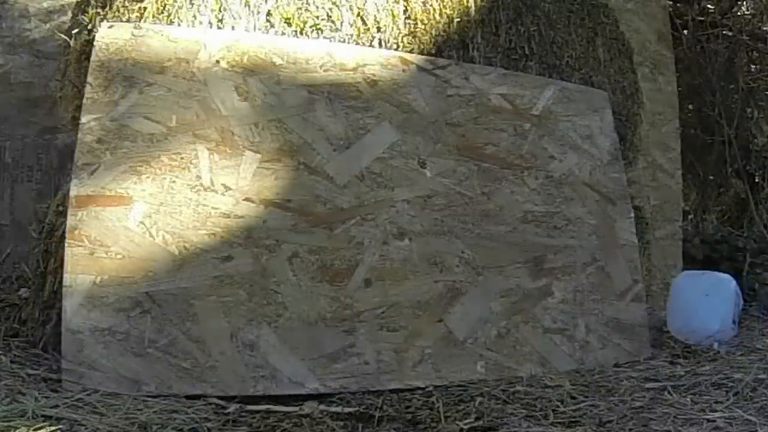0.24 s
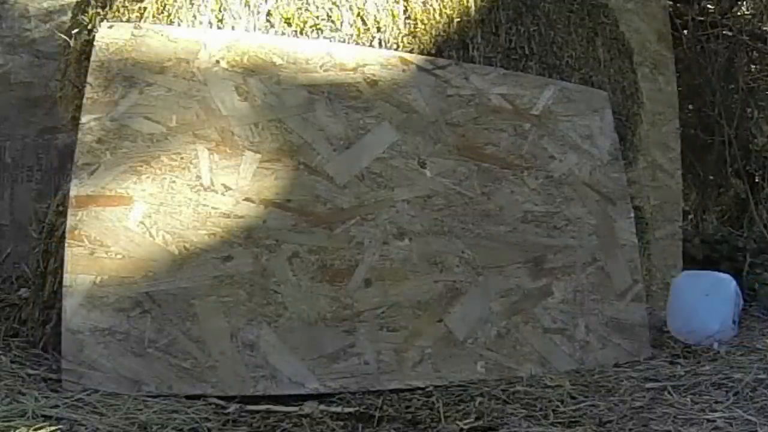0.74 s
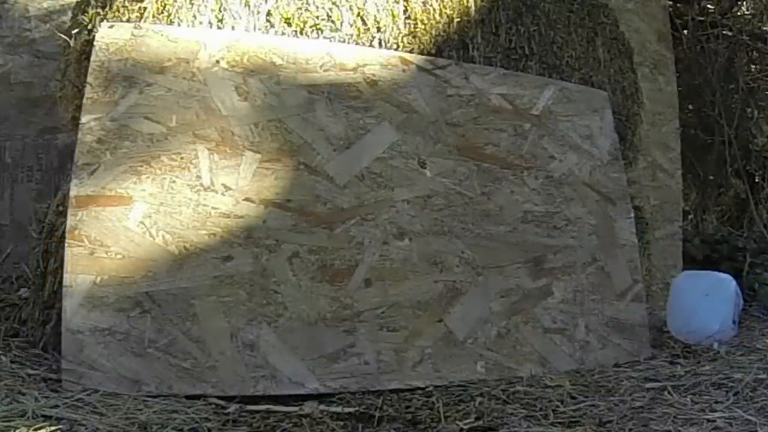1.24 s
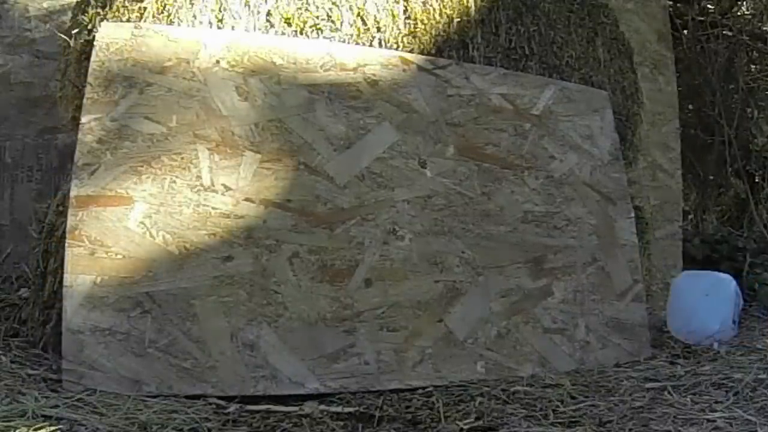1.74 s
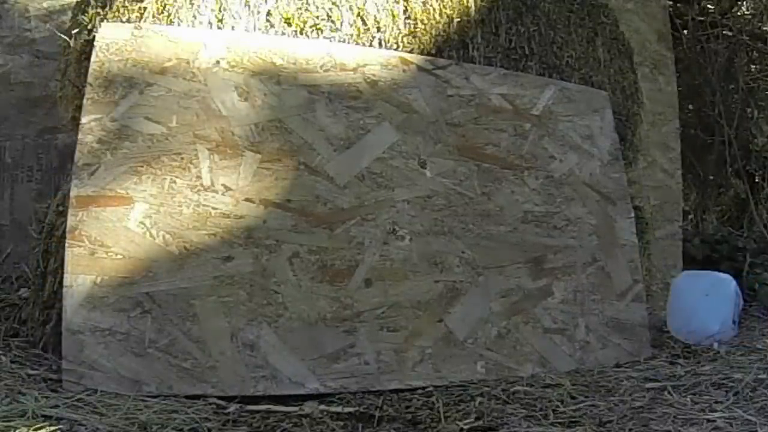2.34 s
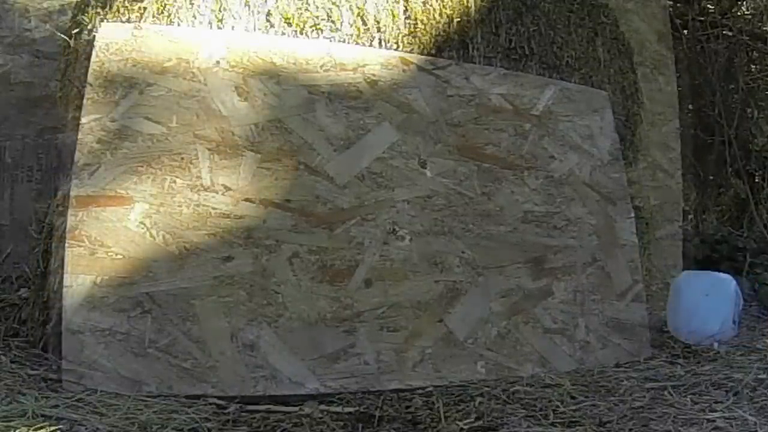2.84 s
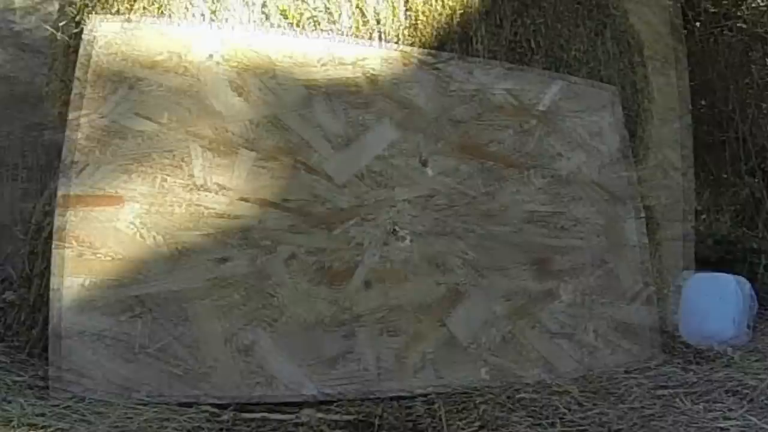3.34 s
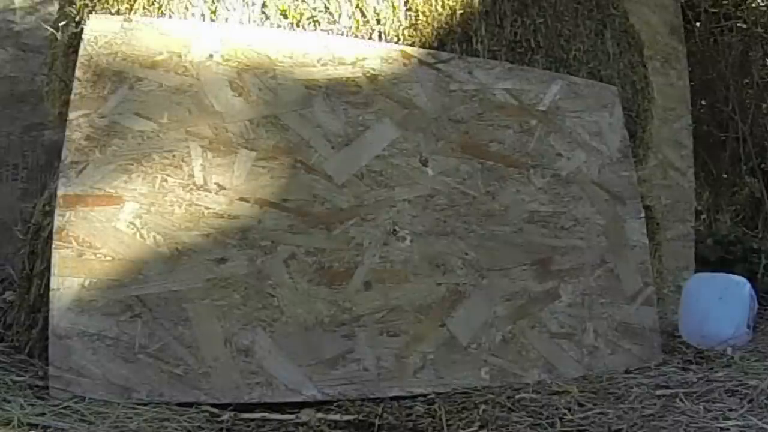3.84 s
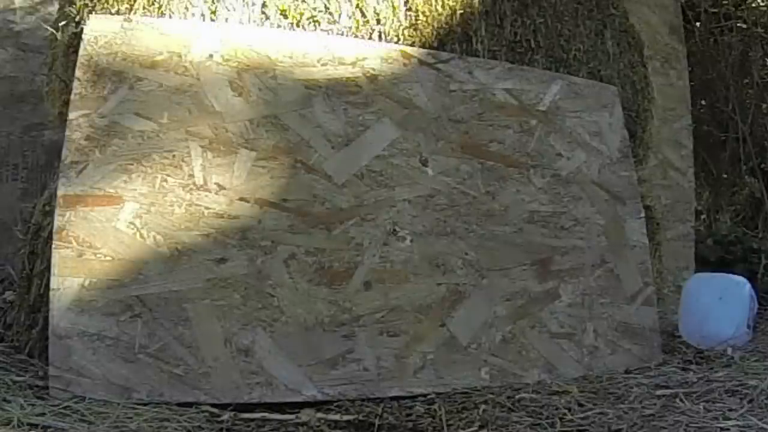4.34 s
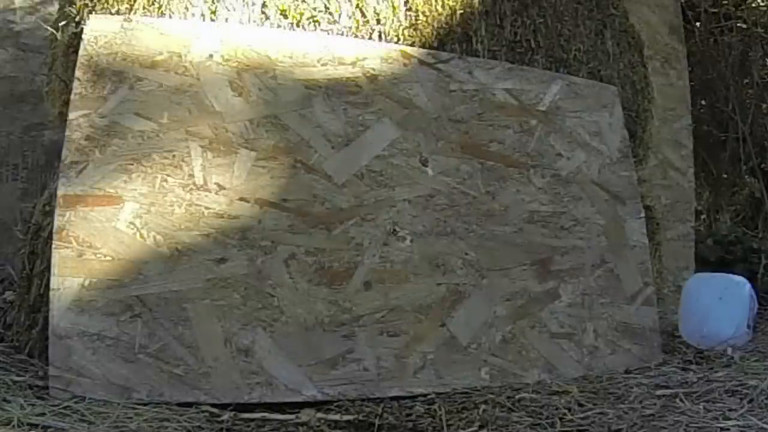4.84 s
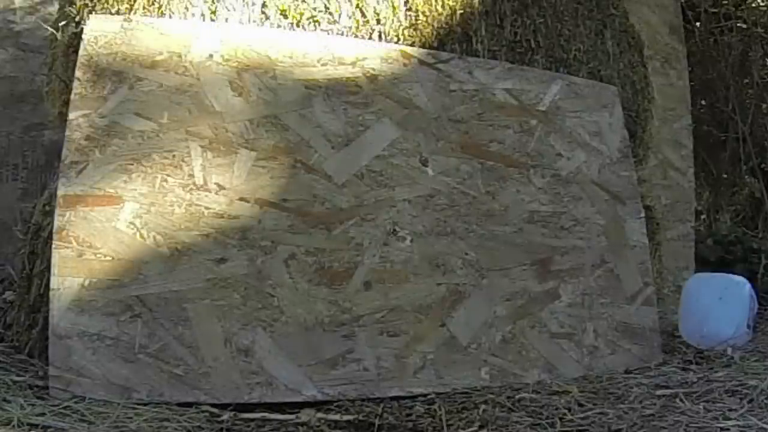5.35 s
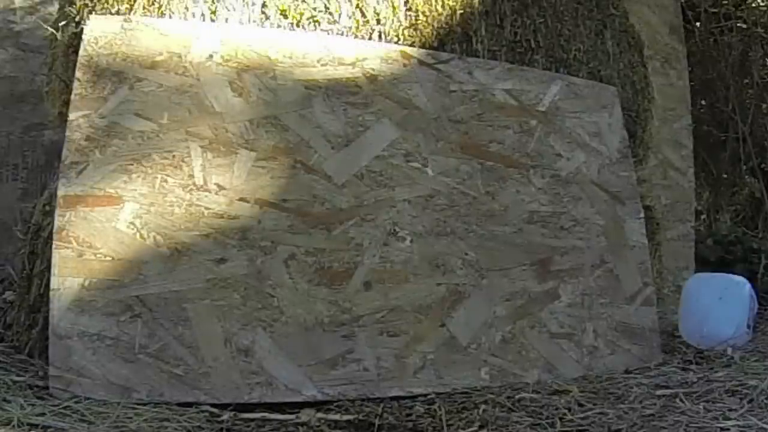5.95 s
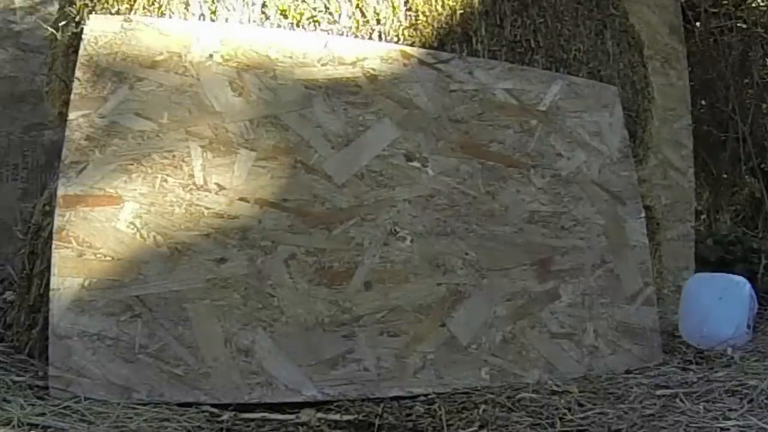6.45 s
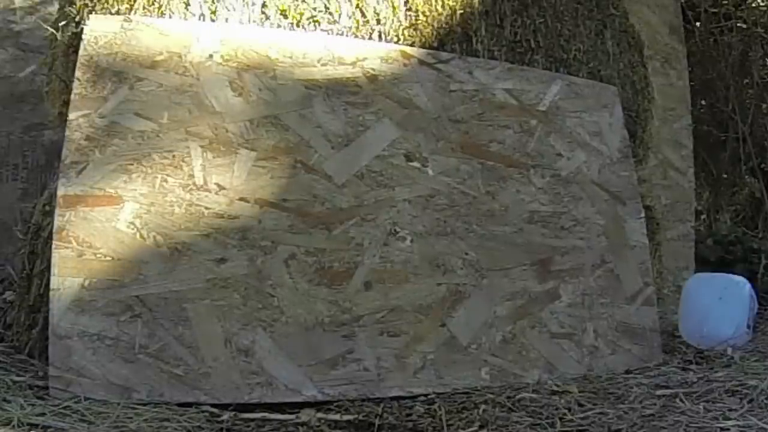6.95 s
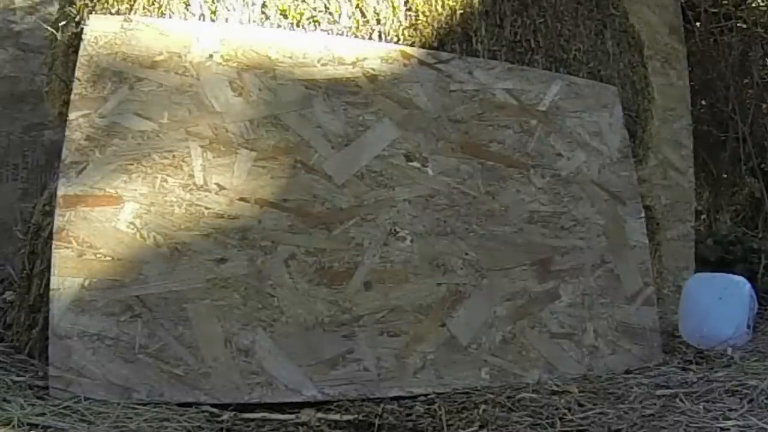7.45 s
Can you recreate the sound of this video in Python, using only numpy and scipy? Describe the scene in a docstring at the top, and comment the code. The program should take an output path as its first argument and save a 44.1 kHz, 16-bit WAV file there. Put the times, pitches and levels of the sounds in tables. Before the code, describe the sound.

Two slowed-down shots outdoors, each a dull fluttering whoosh cut by a huge distorted wooden thud, with booming echo and small taps.

```python
"""Wind rumbles and a faint whine throbs once a frame; then two slingshot shots outdoors, four times slower than
life. Close by, the bands flap as turbulent noise; the ball smacks a wooden sheet, a push that sinks in pitch
and overloads the capsule. The sheet booms, a noisy echo answers close by, a late swell of noise rises and
fades, and small taps follow. The closed camera housing rings as resonances; steps tick through the two cross-
fades; limiting and straight-line slowing colour it all."""
import sys
import numpy as np
from scipy.fft import rfft, irfft, next_fast_len
from scipy.io import wavfile
from scipy.ndimage import uniform_filter1d, minimum_filter1d, map_coordinates

SR = 44100
rng = np.random.default_rng(int(sys.argv[2]) if len(sys.argv) > 2 else 0)


def materialize(psi):
    """Save the field psi as 16-bit PCM at rate SR to the path in sys.argv[1].

    A 1-D psi becomes a single channel; in a 2-D psi each row is a channel.
    """
    bounded = np.clip(np.atleast_2d(psi).T, -1, 1)
    quanta = np.round(bounded * 32767).astype(np.int16)
    wavfile.write(sys.argv[1], SR, quanta)


N = 339393

# The ball lands on the sheet: start_s, drive_db (before overload), first_half_wave_s
BALL_HITS = [(1.4063, 25, .0034), (5.8899, 26, .0039)]
# Resonances of the closed camera housing: centre_hz, width_hz, level_db
HOUSING_MODES = [(260, 74, -14.5), (399, 51, -3.5), (467.2, 50.5, 0.5), (537, 150, -12), (718, 58, -8),
                 (794.6, 72, -4.5), (899, 120, -12), (973, 140, -19.5), (1164, 60, -24), (1210, 74, -23),
                 (1360, 110, -32.5)]
# Colour of the bright noise in flaps, cracks and ticks: frequency_hz, relative_level_db_per_hz
BRIGHT_SPECTRUM = [(850, -35.5), (1450, -5.5), (1660, -9), (1750, -15.5), (2310, 3.5), (2590, -11.5),
                   (2810, -5.5), (2940, -10.5), (3060, -22), (3390, -15), (3800, -25.5), (4940, -56.5),
                   (8360, -120)]
# Runs of steps in the cross-fades: first_s, last_s, first_jump_db, last_jump_db
CROSS_FADES = [(2.644, 3.0782, -62, -43.5), (3.146, 3.145, -55, -59), (7.416, 7.6829, -63.5, -43)]


def amp(db):
    """Decibels to a linear gain."""
    return 10 ** (np.asarray(db) / 20)


def unit(x):
    """The signal scaled to rms 1."""
    return x / np.sqrt(np.mean(x ** 2) + 1e-20)


def since(s):
    """Seconds after a moment, for every sample."""
    return np.arange(N) / SR - s


def wobble(rate):
    """A smooth random curve, rate knots a second."""
    knots = rng.standard_normal(int(N * rate / SR) + 4)
    return map_coordinates(knots, [np.arange(N) * rate / SR])


def filtered(x, response):
    """The signal times a complex response of frequency."""
    m = next_fast_len(N + SR // 2)
    return irfft(rfft(x, m) * response(np.fft.rfftfreq(m, 1 / SR)), m)[:N]


def modes(table):
    """The causal response of a set of resonances, of alternating sign."""
    def response(f):
        total = 0
        for k, (centre, width, db) in enumerate(table):
            resonance = 1j * f * width / (centre * centre - f * f + 1j * f * width)
            total = total + (-1) ** k * amp(db) * resonance
        return total
    return response


def noise(spectrum, rough_db=0, rate=30):
    """Coloured noise of rms 1 whose level wobbles."""
    f, db = np.transpose(spectrum)

    def colour(hz):
        return amp(np.interp(np.log(hz + 1), np.log(f + 1), db, -120, -120))  # straight lines over log frequency
    swells = amp(rough_db * wobble(rate))
    return unit(swells * filtered(rng.standard_normal(N), colour))


def steadied(x, share):
    """Noise with part of its chance swells evened out."""
    power = uniform_filter1d(unit(x) ** 2, size=260)
    return unit(x / (power + .02) ** (share / 2))


def dying(t, db, decay):
    """A gain that swells from t = 0 over 8 ms and falls by decay dB a second."""
    return np.clip(t / .008, 0, 1) * amp(db - decay * np.maximum(t, 0))


def whip(start_db, peak_db, attack, hold, decay):
    """The gain of one band voice: lead-in, attack, hold and decay at every release, then a sharp drop before the hit."""
    # The bands let go: start_s, drop_s, strength_db, lead_in_db, attack_factor
    releases = [(1.201, 1.345, 0.3, -0.5, .95), (5.67, 5.858, 1.55, -2, 1.4)]
    lead_in_db_per_s = 259  # the rustle grows towards the release
    out = np.zeros(N)
    for s, drop, strength_db, lead_db, slower in releases:
        t = since(s)
        rise = slower * attack
        shape_db = np.interp(t, [0, rise], [start_db + lead_db, peak_db])
        shape_db += lead_in_db_per_s * np.minimum(t, 0)
        shape_db -= decay * np.maximum(t - rise - hold, 0)
        drop_db = 1400 * np.clip(since(drop), 0, .012)  # 1400 dB/s for 12 ms
        out += amp(strength_db + shape_db - drop_db)
    return out


def bands():
    """The rubber whips forward as turbulence with a few slaps; the housing's deep and middle modes ring with it."""
    # Slaps of rubber: start_s, deep_db, middle_db, bright_db
    flaps = [(1.215, -20, -19, -39), (1.229, -12.5, -11.5, -31.5), (1.241, -6.5, -19, -36.5),
             (1.259, -15.5, -24, -50), (5.693, -18, -23, -40), (5.704, -14, -16.5, -37.5),
             (5.72, -9.5, -10.5, -28), (5.747, -11, -17.5, -43.5), (5.776, -26, -15.5, -48.5)]
    # Deep, middle, bright and low voice: release_db, peak_db, attack_s, hold_s, decay_db_per_s
    whip_shapes = [(-39, -14, 0.036, 0.039, 260.5), (-43.5, -14.5, .026, 0.0089, 270),
                   (-59.5, -35.5, 0.025, 0.0035, 379), (-41.5, -22.5, .035, .03, 190)]
    # Colour of the low voice: frequency_hz, relative_level_db_per_hz
    low_spectrum = [(12, -32.5), (20, 0), (50, -0.5), (179, -9), (260, -6.5), (340, -29), (570, -120)]
    flap_s, flap_low_db = .0036, -14  # width of a slap; its low part under the deep one

    s, deep_db, middle_db, bright_db = np.transpose(flaps)[:, :, None]
    shape = np.exp(-.5 * (since(s) / flap_s - 1) ** 2)
    slap_levels = (deep_db, middle_db, bright_db, deep_db + flap_low_db)
    slaps = [(amp(db) * shape).sum(axis=0) for db in slap_levels]

    def ring(table):
        dulled = lambda f: modes(table)(f) / (1 + (f / 2000) ** 4)
        return steadied(filtered(rng.standard_normal(N), dulled), share=.6)
    deep, middle = ring(HOUSING_MODES[:4]), ring(HOUSING_MODES[4:])
    bright = noise(BRIGHT_SPECTRUM, rough_db=4.0, rate=150)
    voices = [deep, middle, bright, noise(low_spectrum)]
    return sum((whip(*rule) + slap) * voice for rule, slap, voice in zip(whip_shapes, slaps, voices))


def hits():
    """Bending waves spread by speed: the push starts high, sinks in pitch, shakes the housing and overloads the capsule."""
    out, crack = np.zeros(N), np.zeros(N)
    t = np.arange(SR // 10) / SR
    for s, drive_db, half in BALL_HITS:
        start = round(s * SR)
        sinking = np.sin(np.pi * (t / half) ** .63)
        push = sinking * (np.exp(-t / .0031) + .012 * np.exp(-t / .03))
        out[start:][:len(t)] += amp(drive_db) * push * (1 - np.exp(-(t / .001) ** 2))
        crack[start:][:len(t)] += amp(-31.0 - 60 * t / 0.049) * (1 - np.exp(-(t / 0.0098) ** 2))
    out = out + amp(-1.0) * filtered(out, modes(HOUSING_MODES))
    overloaded = out / (1 + np.abs(out / .972) ** 8) ** (1 / 8)  # flattens at .972
    dulled = filtered(overloaded, lambda hz: 1 / (1 + (hz / 2400) ** 4))
    return dulled + crack * noise(BRIGHT_SPECTRUM)


def tails():
    """The sheet booms on its lowest mode and shivers above it; a quick echo dies away, then a late swell of
    noise rises and thins out."""
    # After each hit: boom_db, damped_after_s, extra_decay_db_per_s, shiver_db, near_db, swell_db, hold_factor
    answers = [(-25, 0.54, 48, 0, -1, 0, 0.95), (-26.5, 0.53, 85, 0, 1, -2, 0.93)]
    # Quick and slow part of the shiver: level_db, decay_db_per_s
    shiver_parts = [(-12.5, 264), (-35, 27)]
    # Upper modes of the sheet, for one of two passes: centre_hz, width_hz, level_db
    sheet_modes = [(93.4, 11, 2.5), (129, 61, -1), (172.4, 26, 1), (223, 26, -2.5)]
    # Near walls, echo and bright echo: slap_db, slap_decay_db_per_s, rest_db, rest_decay_db_per_s
    near_walls = [(-22, 518.5, -40.5, 59.5), (-45.5, 488, -60, 49)]
    # Late swell, plain and bright: level_db, delay_s, attack_s, hold_s (before hold_factor), decay_db_per_s
    late_swells = [(-45.5, 0.19, 0.14, .17, 32.5), (-58.5, 0.21, 0.068, 0.026, 34)]
    # Colour of the echo: frequency_hz, relative_level_db_per_hz
    echo_spectrum = [(140, -16), (230, -3.5), (365, -5.5), (400, -1), (447, 3.5), (549, -1), (610, -9.5),
                     (766, -2), (929, -7.5), (1060, -20), (1200, -23.5), (1560, -30), (2640, -120)]
    # Colour of the bright echo: frequency_hz, relative_level_db_per_hz
    bright_echo_spectrum = [(650, -27), (1100, -3.5), (1270, 0), (1460, -11.5), (1760, -17), (2170, -11.5),
                            (2410, -22.5), (3360, -45.5), (3800, -63.5), (4940, -89), (8360, -120)]
    boom_hz, boom_decay = 54.1, 24  # Hz, dB/s

    boom_gain, shiver_gain, echo_gain = np.zeros(N), np.zeros(N), np.zeros((2, N))
    for (s, *_), answer in zip(BALL_HITS, answers):
        boom_db, damped, damping, shiver_db, near_db, swell_db, longer = answer
        t = since(s + 0.0021)
        boom_gain += dying(t, boom_db - damping * np.maximum(t - damped, 0), boom_decay)
        shiver_gain += sum(dying(t, shiver_db + db, decay) for db, decay in shiver_parts)
        near = [dying(t, slap_db, fast) + dying(t, rest_db, slow)
                for slap_db, fast, rest_db, slow in near_walls]
        swelling = []
        for db, delay, attack, hold, decay in late_swells:
            swell = np.clip((t - delay) / attack, 0, 1)
            falling_s = np.maximum(t - delay - attack - longer * hold, 0)
            swelling.append(swell * amp(db - decay * falling_s))
        echo_gain += amp(near_db) * np.array(near) + amp(swell_db) * np.array(swelling)

    pitch_hz = boom_hz + 1.4 * wobble(10)
    boom = np.sqrt(2) * np.sin(2 * np.pi * np.cumsum(pitch_hz) / SR)
    boom = amp(2.2 * wobble(27)) * boom
    shiver = unit(filtered(rng.standard_normal(N), lambda f: modes(sheet_modes)(f) ** 2))
    echo = echo_gain[0] * noise(echo_spectrum, rough_db=2.0, rate=19)
    bright_echo = echo_gain[1] * noise(bright_echo_spectrum, rough_db=1.5, rate=170)
    return boom_gain * boom + shiver_gain * shiver + echo + bright_echo


def knocks():
    """Chips and the bouncing ball: short dull taps of two sagging partials with a bright tick."""
    # Small taps: start_s, level_db, pitch_hz
    small_taps = [(1.17, -29.5, 538), (1.5, -28, 485), (1.551, -40, 856), (1.576, -31, 784),
                  (1.577, -36, 428), (2.83, -59, 333), (2.892, -48, 625), (2.899, -57, 444),
                  (5.321, -46, 732), (6.002, -32.5, 796), (6.018, -39, 560), (6.034, -30, 460),
                  (6.038, -38, 820), (6.052, -28, 452), (6.07, -39.5, 447)]
    # A soft landing: start_s, level_db, pitch_hz, t60_s, sag_per_s
    soft_landing = [(2.524, -42.5, 290, .42, 12)]
    tap_cycles, tap_sag, tick_db = 29, 3.0, -33  # cycles to fall 60 dB, pitch sag 1/s, tick under the tap

    out, t = np.zeros(N), np.arange(SR // 4) / SR
    tick = noise(BRIGHT_SPECTRUM)
    taps = [(s, db, hz, tap_cycles / hz, tap_sag) for s, db, hz in small_taps]
    for s, db, hz, t60, sag in taps + soft_landing:
        here = slice(round(s * SR), round(s * SR) + len(t))
        cycles = hz * (1 - np.exp(-sag * t)) / sag
        tap = np.sin(2 * np.pi * cycles)
        tap += .6 * np.sin(2 * np.pi * .8 * cycles + rng.uniform(0, 6))
        out[here] += amp(db - 60 * t / t60) * (1 - np.exp(-t / 0.0013)) * tap
        out[here] += amp(db + tick_db - 60 * t / .025) * tick[here]
    landing = abs(since(soft_landing[0][0] + .1)) < .1
    return out * amp(5 * wobble(130) * landing)  # the landing is uneven


def ambience():
    """Wind on the housing, distant air, hiss, and a whine that throbs once a frame; air and hiss sink after a hit."""
    # Level of the wind: time_s, level_db
    gusts = [(0, -41), (.45, -40), (0.799, -43), (1.2, -39), (1.7, -41), (2.3, -53), (2.9, -53),
             (3.339, -42.5), (3.78, -39.5), (4.3, -44), (5.301, -41.5), (5.7, -38.5), (6.2, -45.5),
             (6.799, -53), (7.169, -49.5), (7.45, -52), (7.7, -44)]
    # Colour of the wind: frequency_hz, relative_level_db_per_hz
    wind_spectrum = [(5.9, -29.5), (10, 4), (27, -3.5), (55, -9.5), (85, -16), (170, -24.5), (220, -50),
                     (370, -120)]
    # Colour of the distant air: frequency_hz, relative_level_db_per_hz
    air_spectrum = [(88, -33), (150, -2.5), (216, -0.5), (364, -12), (454, -6.5), (595, -15.5),
                    (701, -12.5), (875, -14), (1120, -26.5), (1300, -26.5), (1500, -35), (1950, -58.5),
                    (3300, -120)]
    # Colour of the hiss: frequency_hz, relative_level_db_per_hz
    hiss_spectrum = [(760, -33.5), (1300, -1), (1420, -9.5), (1580, -8), (1850, -3), (2280, -8.5),
                     (2550, -7.5), (2930, -14.5), (3620, -10.5), (3800, -11.5), (4940, -43.5), (8360, -120)]
    air_db, hiss_db = (-55.5, -66.5, -66), (-75, -92.5, -91.5)  # before a shot, after the first, after the second
    sink_s, dissolve_s = 0.23, 1  # fall after a hit, return from the start of a cross-fade
    frame_hz = 29.97

    sunk = np.array([np.clip(since(hit) / sink_s, 0, 1) - np.clip(since(fade) / dissolve_s, 0, 1)
                     for (hit, *_), (fade, *_) in zip(BALL_HITS, (CROSS_FADES[0], CROSS_FADES[-1]))])

    def level(before_db, *after_db):
        return amp(before_db) * (1 - sunk.sum(axis=0)) + amp(after_db) @ sunk

    frames = frame_hz * np.arange(N) / SR
    frames = frames - np.where(frames < 88, .55, .62)  # the second shot's frames lie a little later
    throb = np.exp(3 * (np.cos(2 * np.pi * frames) - 1)) * amp(3 * wobble(20))
    whine = unit(throb * np.sin(2 * np.pi * 23 * frames + .7 * wobble(15)))  # 23 cycles a frame
    air = noise(air_spectrum, rough_db=1.14, rate=9.9) + amp(-11.5) * whine
    wind_gain = amp(np.interp(since(0), *np.transpose(gusts)))
    wind = wind_gain * noise(wind_spectrum, rough_db=-2.0, rate=4.5)
    hiss = noise(hiss_spectrum, rough_db=0.6)
    return wind + level(*air_db) * air + level(*hiss_db) * hiss


def frame_steps():
    """During a cross-fade the waveform jumps down once a frame, by more in each long run, and creeps back."""
    step_s, creep_s = .0334, 0.0077
    jumps = np.zeros(N)
    for first, last, first_db, last_db in CROSS_FADES:
        k = np.arange(round((last - first) / step_s) + 1)
        places = np.round((first + .0008 + k * step_s) * SR).astype(int)
        jumps[places] = -np.linspace(amp(first_db), amp(last_db), len(k))

    def creep(hz):
        return 1 / (1 / creep_s / SR + 2j * np.pi * hz / SR) / (1 + (hz / 9000) ** 2)
    return filtered(jumps, creep)


def scene():
    """The shots, their answers and the surroundings at the microphone."""
    return (ambience() + bands() + hits() + tails() + knocks())[None]


def record(dry):
    """A limiter holds the peaks near full scale; slowing down by straight-line interpolation mirrors the sound round
    the slowed sampling rate; the frame steps join and the highest peaks clip."""
    slow_sr, camera_hz, top_hz = 12000, 3830, 15800  # slowed sampling rate, slowed band limit, final band limit
    needed = np.minimum(1, 1.012 / (np.abs(dry[0]) + 1e-9))
    limiter_gain = uniform_filter1d(minimum_filter1d(needed, size=264), size=132)
    x = filtered(dry[0] * limiter_gain, lambda hz: hz < camera_hz)
    mirror = 2 * x * np.cos(2 * np.pi * slow_sr * np.arange(N) / SR)
    x = x + amp(2.0) * filtered(mirror, lambda hz: np.sinc(hz / slow_sr) ** 2)
    clipped = np.clip(x + frame_steps(), -1, 1)
    noisy = clipped + amp(-97.5) * rng.standard_normal(N)
    return filtered(noisy, lambda hz: hz < top_hz)[None]


dry = scene()
out = record(dry)
materialize(out)
```